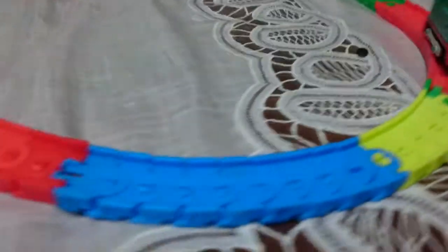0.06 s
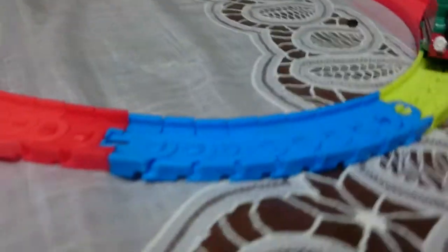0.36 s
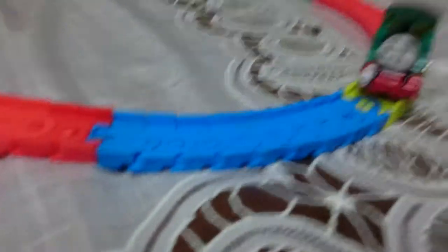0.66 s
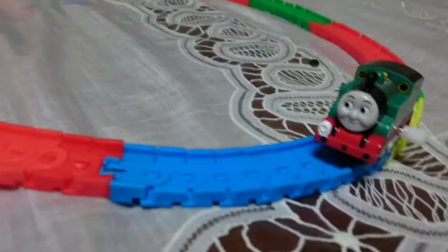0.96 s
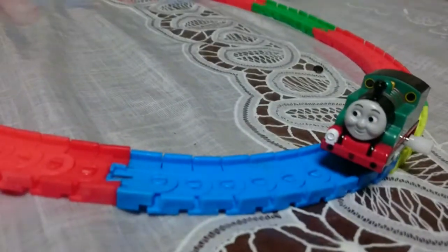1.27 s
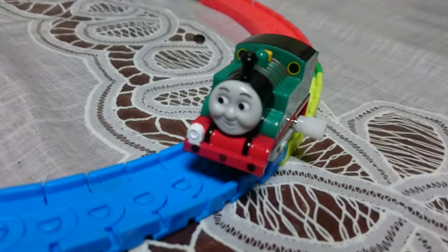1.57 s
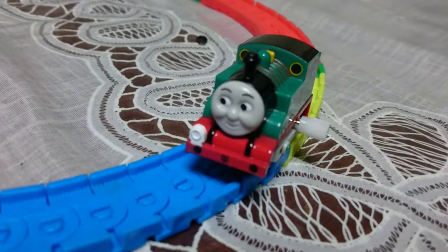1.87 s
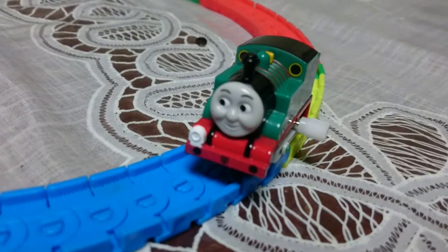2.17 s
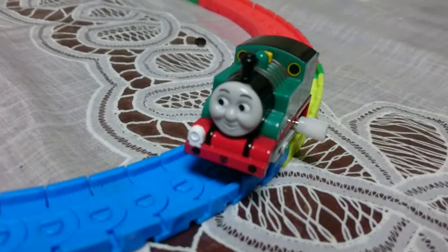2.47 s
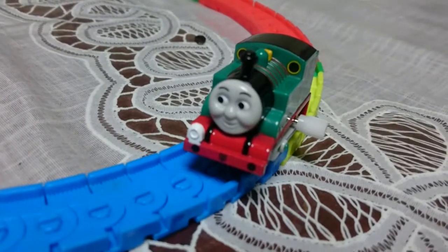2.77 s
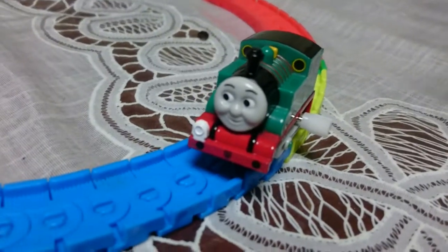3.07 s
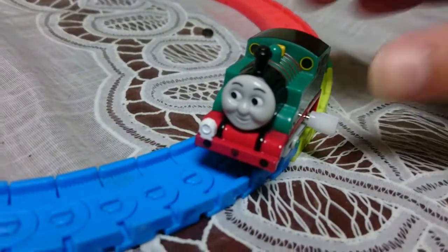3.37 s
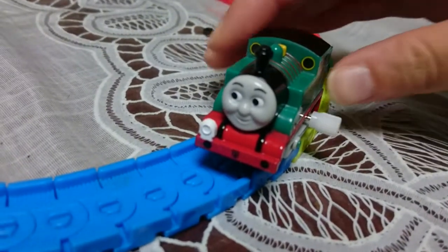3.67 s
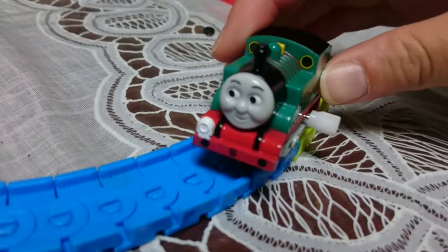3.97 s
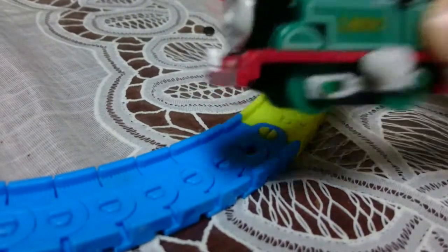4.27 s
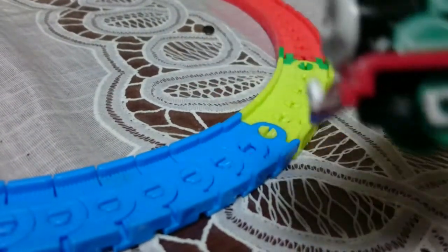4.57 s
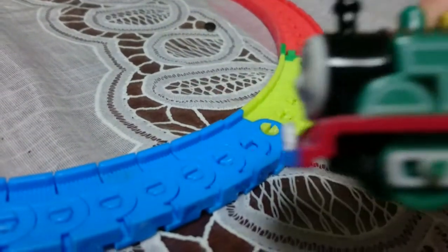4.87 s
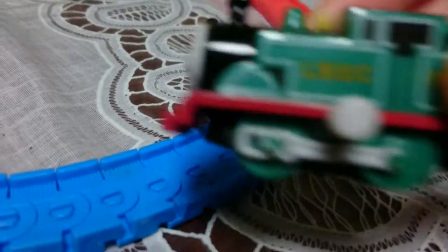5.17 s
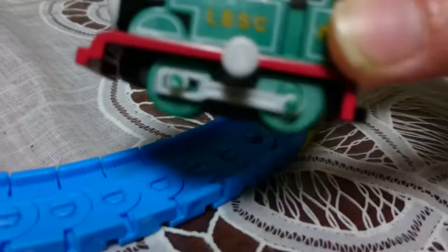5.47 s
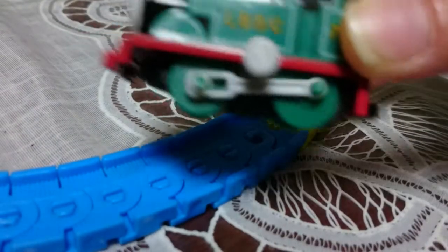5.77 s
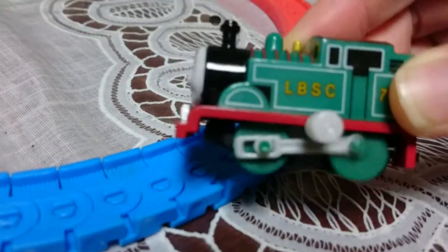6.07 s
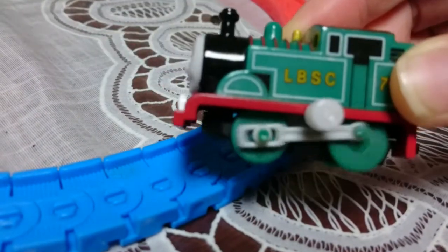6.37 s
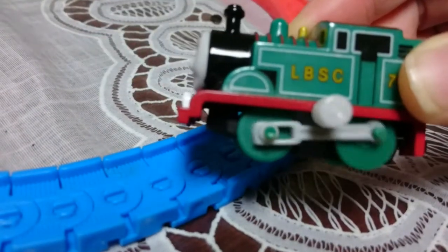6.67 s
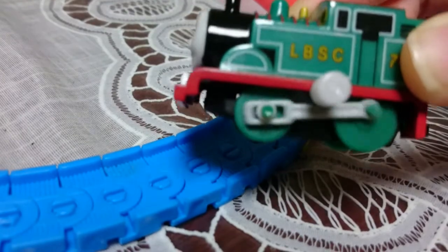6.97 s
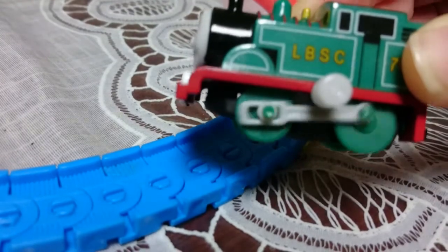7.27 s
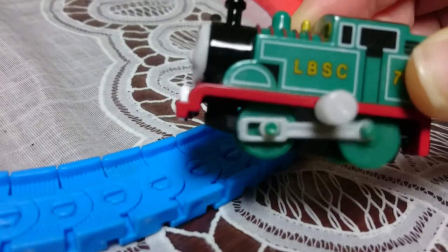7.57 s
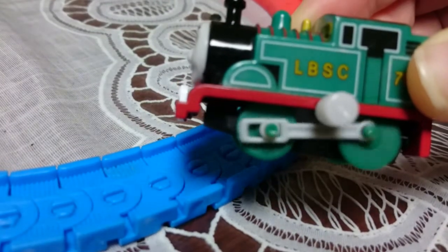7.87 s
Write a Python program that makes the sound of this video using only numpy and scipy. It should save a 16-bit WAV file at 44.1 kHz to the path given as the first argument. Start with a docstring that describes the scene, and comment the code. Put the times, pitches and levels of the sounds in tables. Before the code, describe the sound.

A small wind-up toy train rattles along a plastic track, close to the microphones, its gears grinding and clicking unevenly over a light hollow rumble with a few bumps. At about 1.1 seconds it stalls. Only the quiet room remains, with soft air noise, a low electrical hum and a thin steady whine; a tiny tick and a barely audible sleeve swish come just after 3 seconds. At 4.2 seconds the train is lifted and its wheels race in a louder, bright, raspy plastic whirr that stops sharply near 5 seconds. It whirs again from 5.4 to 6.3, briefly from 6.4 to 6.6, and from 6.7 until about 7.9 seconds, with small gear clicks in the short breaks. The whirr dips momentarily as the gears snag, shifts in tone as the toy moves, and gradually slows from a rasp to a buzz.

```python
"""A clockwork toy train

A small wind-up train rattles along a plastic track on a table and stalls. Lifted by hand, its wheels
spin free in four whirring runs while the spring winds down. The escapement (a rocking catch that lets
a toothed wheel pass one tooth at a time) and the loose gears tick into the hollow plastic shell and
make it ring. It is close to two microphones, in a quiet room with mains hum and a steady whine."""
import sys
import numpy as np
from scipy import signal
from scipy.fft import rfft, irfft, next_fast_len
from scipy.io import wavfile
from scipy.ndimage import uniform_filter1d, map_coordinates

SR = 44100
rng = np.random.default_rng(int(sys.argv[2]) if len(sys.argv) > 2 else 0)


def master(y):
    """Save y as 16-bit WAV."""
    cut = np.clip(np.atleast_2d(y).T, -1, 1)
    pcm = np.round(cut * 32767)  # scale
    wavfile.write(sys.argv[1], SR, pcm.astype(np.int16))


N = 349272
TIME = np.arange(N) / SR

# The room's steady air noise. Each row: frequency in Hz, relative level in dB.
AIR_COLOUR = [(25, -18), (55, -3), (110, 0), (180, -5.5), (205, 4.5), (225, -3.5), (242, 5), (275, -2.5),
              (370, 0), (460, -8.5), (660, -1.5), (1000, -6), (2500, -16.5), (4500, -23), (8500, -28),
              (15500, -29.5)]
# How noise and hum lean to one side. Each row: frequency in Hz, left minus right in dB.
SIDE_LEAN = [(60, -3), (200, -2), (380, -6), (800, -4), (2400, -1.5), (8000, -1)]
# An appliance's hum and whine. Each row: frequency in Hz, level in dB.
HUM_TONES = [(48.7, -69), (98.4, -75.5), (99.9, -61), (141, -81.5), (145.3, -70), (200, -76), (376, -75),
             (394.5, -76.5), (422, -81), (494, -76.5), (542, -79.5), (797.7, -61.5), (1125, -82.5),
             (1595, -85.5)]
# A sleeve brushing the tablecloth. Each row: frequency in Hz, relative level in dB.
CLOTH_COLOUR = [(1500, -30), (3200, -10), (5200, -7), (7000, 0), (8000, -9), (11800, -11), (15000, -28)]
# The track's rumble. Each row: frequency in Hz, relative level in dB.
RUMBLE_COLOUR = [(30, -23), (50, -1), (80, 0), (115, 2.5), (150, 1), (250, 0.5), (350, -0.5), (460, -13.5),
                 (600, -4.5), (900, -6.5), (1050, -16), (1400, -11.5), (2500, -41)]
# The wheels drop over joints in the track. Each row: time in seconds, strength in dB.
JOINT_BUMPS = [(.195, 0), (0.511, -2), (.795, 5), (1.0, -10)]
# The train jolts against the rails. Each row: time in seconds, relative strength in dB.
RAIL_JOLTS = [(0.009, 8), (.054, -7), (.098, -9), (.195, -4.5), (.353, -8), (.41, 4.5), (0.499, 12.5),
              (.587, 1), (.712, 10), (.784, 8.5), (.903, -6), (.958, -4), (1.096, 11)]
# Stretches of track, each with its own drag and angle. Each row: start in seconds, teeth per second,
# relative gear level in dB, rumble level in dB, band aimed at the microphones in Hz, its boost in dB.
TRACK_STRETCHES = [(0, 108.1, -39, -54.5, 3900, 4.5), (.17, 99.92, -40.5, -53.5, 4200, 3),
                   (.35, 91.8, -39, -54, 4860, 2.5), (.515, 72.33, -43.5, -58.3, 4000, 3.5),
                   (.89, 83.68, -37, -51, 5900, 5)]
# The shell's modes, the tones it rings at. Each row: frequency in Hz, width in Hz, then left and right
# relative levels in dB for each of three poses: 0 on the track, 1 lifted, 2 held side-on.
SHELL_MODES = [(1405, 266, -14, -5.5, -12, -3, -9.5, -0.5), (1929, 276, -4.5, -4.5, -10, -5.5, -6.5, -0.5),
               (2427, 730, -14, -8, -18, -4, -11.5, -31), (2698, 406, -3, -0.5, -10, -6.5, -1, 2),
               (3096, 505, -6.5, -4.5, -3, -6, -0.5, -25), (3640, 296, -16, -1.5, -4.5, -27, -13.5, -5.5),
               (3906, 500, -0.5, -9.5, -10.5, -10.5, -10, -41), (4457, 230, -4, -7, -5, -37, -11.5, -14.5),
               (5140, 570, -8, -15, -9, -12, -25, -10.5), (5540, 450, -9, -5, -1.5, -8, -3.5, -16.5),
               (5920, 500, -1.5, -11, -1.5, -12, 0.5, -8), (6370, 680, -8, -1.5, 0, -10.5, 0.5, -38),
               (7010, 600, -0.5, -12, -2.5, -9, -3.5, -2.5), (7624, 530, -11, -2.5, -11, -0.5, 4, -4.5),
               (8305, 420, -11, 1.5, -8, -4, 0, -30), (9060, 910, -5.5, -11, -4, -6.5, -13, -2),
               (9590, 580, -10, -6.5, -9, -2, -1, -27), (10340, 690, -10, 1, -4.5, -20, -8.5, -9),
               (11230, 1200, -12, -2, -18, 0.5, -17, -2), (12400, 1300, -8, -2, -5.5, -9, -2.5, -15),
               (12870, 1140, -5, -7, -4, -9, -8.5, -15), (13700, 1500, -14, -11, -13, -12, -13, -11),
               (15200, 1700, -14, -22, -8.5, -17, -12, -11)]
# The stalled gears slip by a tooth. Each row: time in seconds, relative strength in dB.
TOOTH_SLIPS = [(3.059, -27), (6.372, -12), (6.674, -17)]
# The gears snag and the whirr dips. Each row: time in seconds, depth in dB.
GEAR_SNAGS = [(.538, 9.5), (4.776, 6), (5.612, 4.5), (5.83, 4.5), (6.075, 2.5), (6.975, 1.5), (7.168, 2)]
# The wheels run free until a finger stops them. Each row: start and stop in seconds, base level in dB,
# fade-in in seconds, braking in dB per second, pose, band aimed at the microphones in Hz, boost in dB.
FREE_RUNS = [(4.156, 4.956, -32, .011, 650, 1, 6100, 2.5), (5.378, 6.28, -31.5, 0.037, 652, 2, 12040, 4),
             (6.375, 6.596, -32, 0.03, 400, 2, 4060, 3), (6.712, 7.93, -32.5, 0.032, 425, 2, 10200, 2.5)]
# Where the train is. Each row: time in seconds, distance in cm, delay of the table's echo in ms.
TRAIN_PATH = [(1.1, 17, 0.34), (4.16, 16, 0.535), (4.35, 19.6, 1.11), (4.9, 11.4, 1.17), (5.45, 17.2, 1.53),
              (5.92, 13.2, 1.196), (6.2, 13.6, 1.09), (6.9, 16.3, 1.11), (7.25, 13.9, 1.09),
              (7.9, 14.7, 1.18)]

STALL_S = 1.064  # the train stalls on the track
FREE_TEETH_PER_S, UNWIND_HZ_PER_S = 365.5, 47  # first speed off the track, and how fast it drops
REFERENCE_CM = 14.36  # nearer than this the free runs get louder, farther away softer


def undb(db):
    """Turn decibels into a gain to multiply by."""
    return np.exp(np.asarray(db) * (np.log(10) / 20))


def unit(x):
    """Scale a sound to an average (rms) level of 1."""
    return x / np.sqrt(np.mean(x ** 2) + 1e-20)


def curve(rows, at):
    """Join (seconds, value) rows by straight lines."""
    return np.interp(at, *np.transpose(rows))


def colour(points, hz):
    """Read between (Hz, value) points, with every octave equally wide."""
    point_hz, value = np.transpose(points)
    return np.interp(np.log(hz + 1e-3), np.log(point_hz), value)


def wander(t, rate):
    """A random wobble of size about 1 that turns `rate` times a second."""
    knots = rng.standard_normal(8192)
    return 1.2 * np.interp(t * rate, np.arange(len(knots)), knots)


def span(start, stop):
    """The sample times between two moments."""
    return TIME[(TIME >= start) & (TIME <= stop)]


def place(t, sound):
    """Put a short sound at its place in the whole scene."""
    start = int(round(t[0] * SR))
    return np.pad(sound, ((0, 0), (start, N - start - len(t))))


def stereo_noise(points, apart_hz):
    """Shaped noise whose left and right are alike in the bass and unrelated well above apart_hz."""
    length = next_fast_len(N)
    hz = np.fft.rfftfreq(length, 1 / SR)
    alike = .84 / (1 + (hz / apart_hz) ** 4)
    mid, side = rfft(rng.standard_normal((2, length)))
    sign = np.array([[1], [-1]])
    both = mid * np.sqrt(1 + alike) + sign * side * np.sqrt(1 - alike)
    shape_db = colour(points, hz) + sign * colour(SIDE_LEAN, hz) / 2
    return unit(irfft(both * undb(shape_db), length)[:, :N])


def room_tone(air_db=-58, waver_db=0.8, drift_hz=0.34):
    """Soft air noise and hum tones that drift together; the close pair near 100 Hz throbs slowly."""
    out = stereo_noise(AIR_COLOUR, apart_hz=950) * undb(air_db)
    drift = drift_hz * wander(TIME, 6.13)
    for hz, db in HUM_TONES:
        phase = 2 * np.pi * np.cumsum(hz + drift) / SR
        lean_db = np.array([[1], [-1]]) * colour(SIDE_LEAN, hz) / 2
        tone = np.sqrt(2) * np.sin(phase) * undb(waver_db * wander(TIME, 5))
        out = out + tone * undb(db + lean_db)
    return out


def wall_echo(sound, fade_s=0.099, echo_db=-20):
    """The furnished room adds a faint, short tail that falls 60 dB in fade_s."""
    t = TIME[:SR // 2]
    tail = rng.standard_normal((2, len(t))) * undb(-60 * t / fade_s) * (t > .005)
    tail /= np.sqrt(np.sum(tail ** 2, axis=1, keepdims=True))
    return undb(echo_db) * signal.fftconvolve(sound, tail, axes=1)[:, :N]


def table_echo(sound, echo_db=-12.0, right_later_ms=0.08):
    """One bounce off the table boosts some pitches and dulls others; they glide as the train moves."""
    delay_ms = curve([(s, ms) for s, _, ms in TRAIN_PATH], TIME) + np.array([[0], [right_later_ms]])
    read_at = np.arange(N) - delay_ms * SR / 1000
    delayed = [map_coordinates(channel, [at], order=3) for channel, at in zip(sound, read_at)]
    return undb(echo_db) * np.array(delayed)


def sleeve(at_s=3.24, swell_s=0.082, db=-70):
    """Cloth swishes softly as the hand reaches for the train."""
    swell = np.exp(-((TIME - at_s) / swell_s) ** 2)
    return stereo_noise(CLOTH_COLOUR, apart_hz=2000) * swell * undb(db)


def track_setting(t, column, settle_s=0.021):
    """One column of TRACK_STRETCHES over time, eased from each stretch to the next."""
    rows = np.array(TRACK_STRETCHES)
    under_train = np.searchsorted(rows[1:, 0], t)
    return uniform_filter1d(rows[under_train, column], int(settle_s * SR))


def flare(t, knocks, rise_s, fade_s, db=0):
    """A gain that swells quickly at each knock and falls back to 1."""
    return 1 + sum(undb(strength + db) * np.exp(-np.maximum((s - t) / rise_s, (t - s) / fade_s))
                   for s, strength in knocks)


def track_rumble(rough_db=1.5, stop_db_per_s=115):
    """The wheels drum on the hollow track, harder at its joints, until the train stalls."""
    stall_db = stop_db_per_s * np.maximum(TIME - STALL_S, 0)
    db = track_setting(TIME, column=3) - stall_db + rough_db * wander(TIME, 60.2)
    bumps = flare(TIME, JOINT_BUMPS, rise_s=.008, fade_s=0.049)
    return stereo_noise(RUMBLE_COLOUR, apart_hz=1100) * bumps * undb(db)


def escapement(t, speed, jitter, tock_db, scatter_db):
    """The catch strikes twice a tooth, tick and tock, a little unevenly. Gives times and sizes."""
    beats_so_far = 2 * np.cumsum(speed * (1 + .015 * wander(t, 25))) / SR
    timing, strength = rng.standard_normal((4096, 2))[:int(beats_so_far[-1])].T
    beat = np.arange(len(timing))
    times = np.interp(beat + jitter * timing, beats_so_far, t)
    return times, undb(tock_db * (beat % 2) + scatter_db * strength)


def loose_teeth(t, per_second, size_db, scatter_db):
    """Loose gear teeth knock together at random, a few of them hard. Gives times and sizes."""
    length_s = t[-1] - t[0]
    when, chance = rng.random((12000, 2))[:int(per_second * length_s)].T
    force = np.minimum(-np.log(1 - chance), 5)
    return t[0] + when * length_s, undb(size_db + scatter_db * force)


def snags(t, dip_s=0.019):
    """A gain that dips briefly each time the gears snag."""
    return undb(-sum(depth * np.exp(-((t - s) / dip_s) ** 2) for s, depth in GEAR_SNAGS))


def shell_ring(t, impacts, pose, lag_ms, apart_hz, beam_hz=1, beam_db=0):
    """Each knock rings the shell's modes in its own mix; high modes differ more from left to right."""
    mix_spread, sway_db, travel_ms, beam_octaves = 0.21, 1.53, .35, 0.18
    times, sizes = np.concatenate(impacts, axis=1)
    mic_db = np.array(SHELL_MODES)[:, 2:].reshape(-1, 3, 2)[:, pose]
    length = next_fast_len(len(t) + 1024)
    hz = np.fft.rfftfreq(length, 1 / SR) + 1e-3
    right_lag = np.exp(-2j * np.pi * hz * np.array([[0], [lag_ms]]) / 1000)
    spectrum = 0
    for k, (centre, width, *_) in enumerate(SHELL_MODES):
        chance = rng.standard_normal((16000, 4))[:len(times)].T
        # a knock takes a moment to travel from the gears to each wall
        arrival = times + travel_ms * np.abs(chance[3]) / 1000
        sample = np.clip(((arrival - t[0]) * SR).astype(int), 0, len(t) - 1)
        weights = np.sign(chance[:3]) + mix_spread * chance[:3]  # shared, left, right
        alike = 1 / (1 + (centre / apart_hz) ** 2)
        mix = np.sqrt(alike) * weights[0] + np.sqrt(1 - alike) * weights[1:]
        # modes near the band aimed at the microphones are louder; each sways as the shell wobbles
        aim_db = beam_db * np.exp(-(np.log2(centre / beam_hz) / beam_octaves) ** 2)
        boost_db = np.broadcast_to(aim_db, t.shape)[sample] + sway_db * wander(times, 6)
        knocks = sizes * undb(boost_db) * mix
        force = np.array([np.bincount(sample, side, length) for side in knocks])
        # the lowest mode, the open hollow's, has gentler slopes and reaches both sides together
        steepness, lag = (1.31, 1) if k == 0 else (2, right_lag)
        mode = 1 / (1 + 1j * (hz / centre - centre / hz) * centre / width) ** steepness
        spectrum = spectrum + rfft(force) * mode * undb(mic_db[k])[:, None] * lag
    return unit(irfft(spectrum, length)[:, :len(t)])


def tooth_slip(start, db, fade_s=0.0058, gain_db=-33):
    """One tooth slips and the gears chatter for a moment."""
    t = span(start, start + 0.015)
    knocks = loose_teeth(t, per_second=1500, size_db=0, scatter_db=5.5)
    chatter = shell_ring(t, [knocks], pose=2, lag_ms=0.21, apart_hz=6000)
    return place(t, chatter * np.exp(-(t - start) / fade_s) * undb(db + gain_db))


def gears_on_track(shake_db=1.52, stop_db_per_s=439, gain_db=1.5):
    """Under load the gears grind unevenly and flare up at each jolt, until the train stalls."""
    t = span(0, STALL_S + .15)
    speed, gear_db, beam_hz, beam_db = (track_setting(t, column) for column in (1, 2, 4, 5))
    times, sizes = loose_teeth(t, per_second=6000, size_db=-6, scatter_db=1.5)
    jolts = flare(t, RAIL_JOLTS, rise_s=0.0033, fade_s=0.0063, db=-3)
    load = undb(shake_db * wander(t, 109.8)) * jolts
    chatter = times, sizes * np.interp(times, t, load)
    ticks = escapement(t, speed, jitter=.2, tock_db=-3, scatter_db=4)
    gears = shell_ring(t, [ticks, chatter], pose=0, lag_ms=-0.034, apart_hz=2920,
                       beam_hz=beam_hz, beam_db=beam_db)
    stall_db = stop_db_per_s * np.maximum(t - STALL_S, 0)
    return place(t, gears * snags(t) * undb(gear_db - stall_db + gain_db))


def free_speed(t):
    """Teeth per second off the track: the spring unwinds only while the wheels turn."""
    turned_s = sum(np.clip(t - start, 0, stop - start) for start, stop, *_ in FREE_RUNS)
    return FREE_TEETH_PER_S - UNWIND_HZ_PER_S * turned_s


def free_run(start, stop, db, fade_in_s, brake_db_per_s, pose, beam_hz, beam_db, flutter_db=0.78):
    """Off the track the wheels race: a rasp that turns to a buzz as the spring weakens."""
    t = span(start, stop + .1)
    speed = free_speed(t)
    ticks = escapement(t, speed, jitter=.15, tock_db=1, scatter_db=0.75)
    chatter = loose_teeth(t, per_second=2600, size_db=-11.5, scatter_db=2.0)
    whirr = shell_ring(t, [ticks, chatter], pose, lag_ms=0.23, apart_hz=8000,
                       beam_hz=beam_hz, beam_db=beam_db)
    speed_db = 6.5 * np.log2(speed / FREE_TEETH_PER_S)  # slower ticks are softer
    brake_db = brake_db_per_s * np.maximum(t - stop, 0)
    level_db = db + speed_db - brake_db + flutter_db * wander(t, 55)
    fade_in = np.minimum((t - start) / fade_in_s, 1) ** 2
    nearness = REFERENCE_CM / curve([(s, cm) for s, cm, _ in TRAIN_PATH], t)
    return place(t, whirr * fade_in * nearness * snags(t) * undb(level_db))


def scene():
    """The train on the track, then in the hand, over the table in its room."""
    train = gears_on_track() + sum(free_run(*row) for row in FREE_RUNS)
    train += sum(tooth_slip(*row) for row in TOOTH_SLIPS)
    return train + table_echo(train) + wall_echo(train) + track_rumble() + sleeve() + room_tone()


def record(dry):
    """Cut away the highest treble, above 15850 Hz."""
    return signal.sosfilt(signal.ellip(12, .2, 75, 15850, fs=SR, output="sos"), dry)


dry = scene()
out = record(dry)
master(out)
```